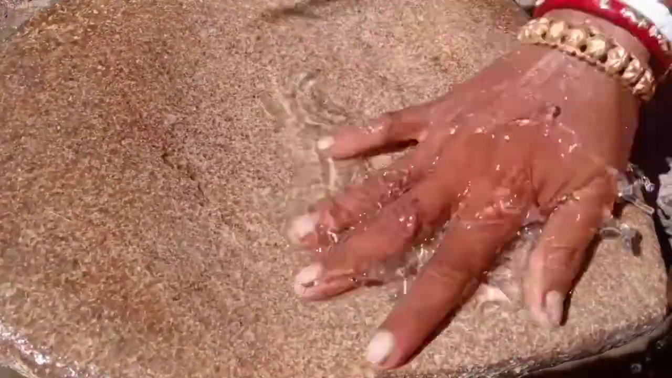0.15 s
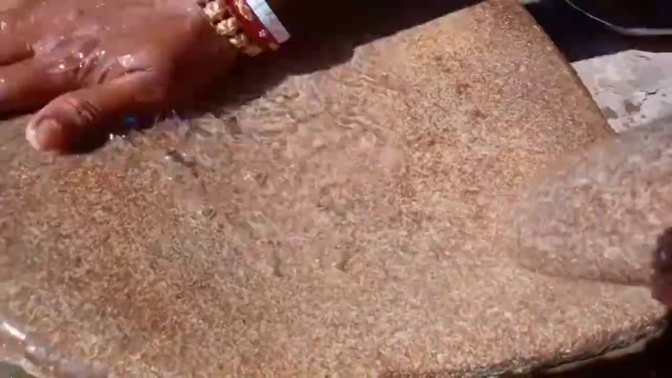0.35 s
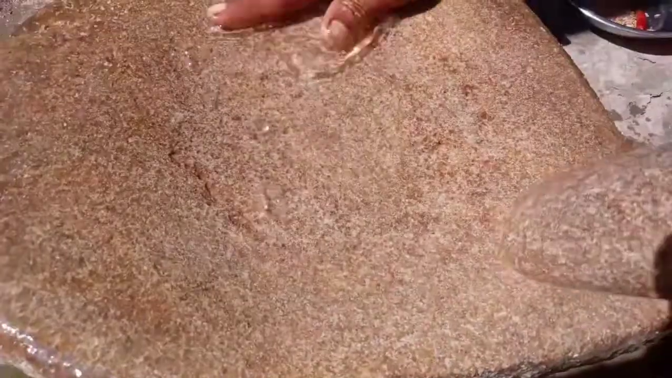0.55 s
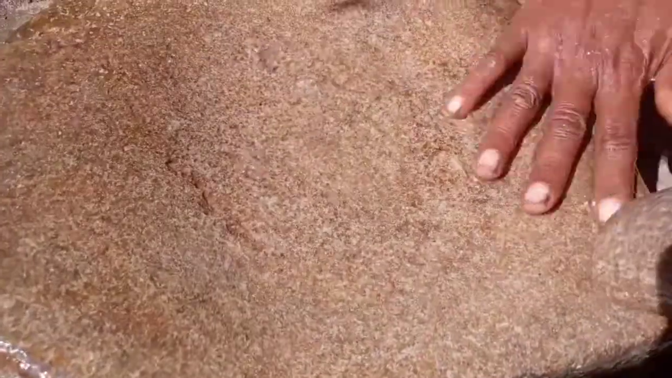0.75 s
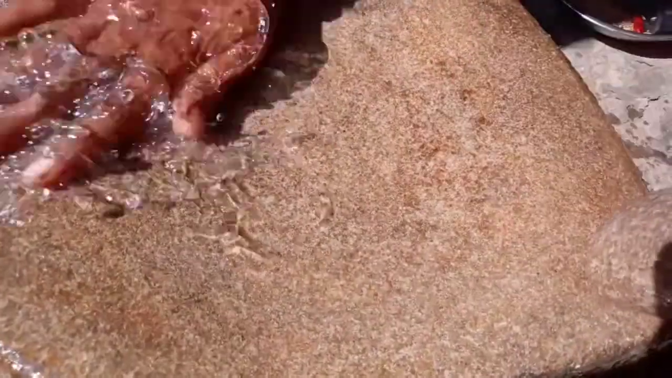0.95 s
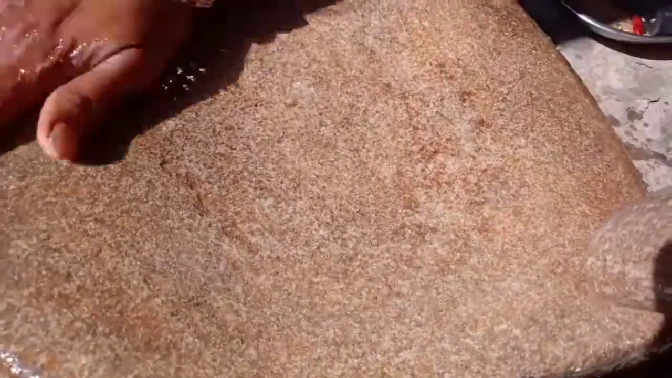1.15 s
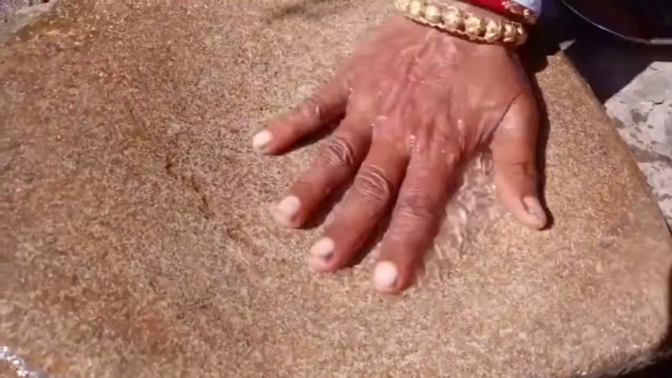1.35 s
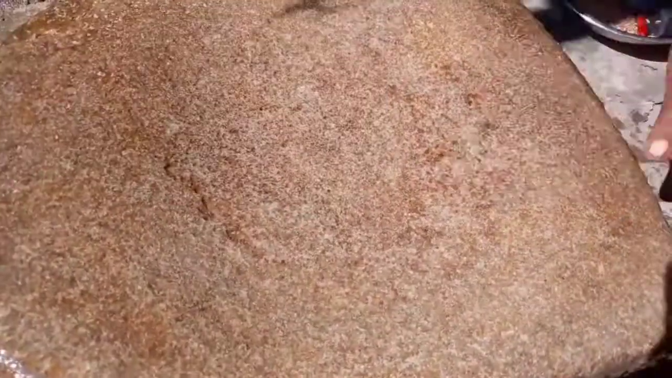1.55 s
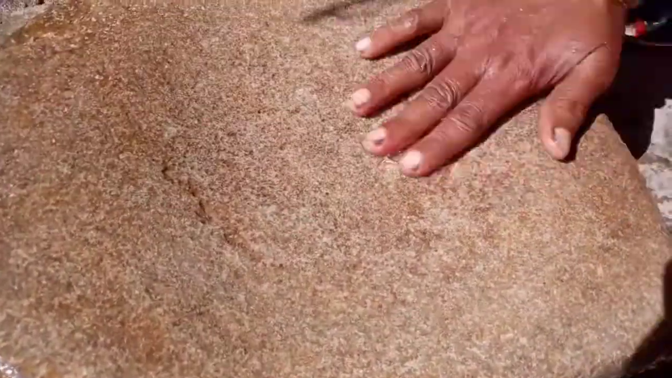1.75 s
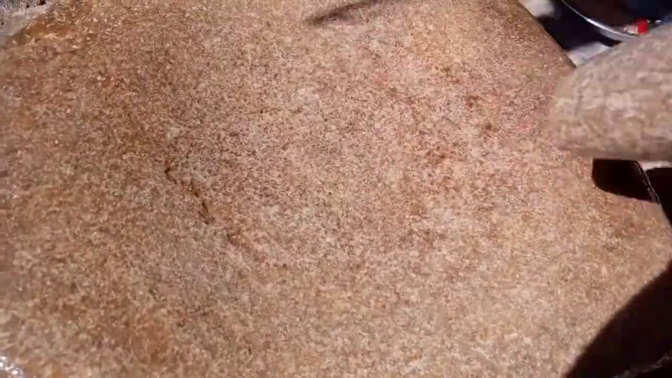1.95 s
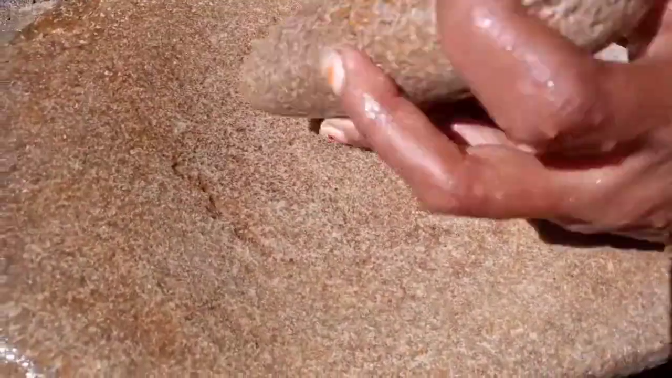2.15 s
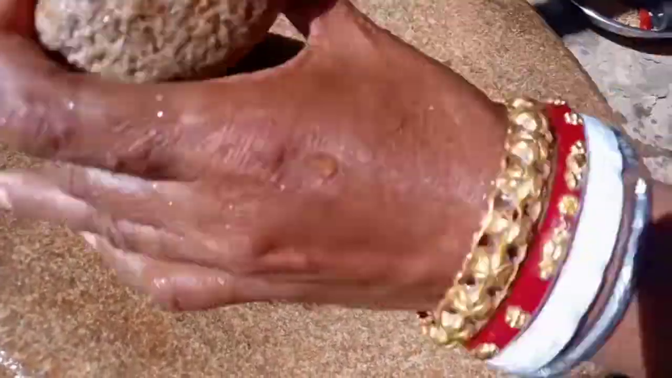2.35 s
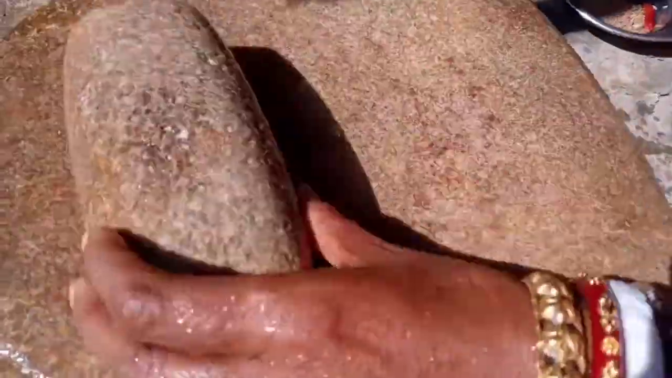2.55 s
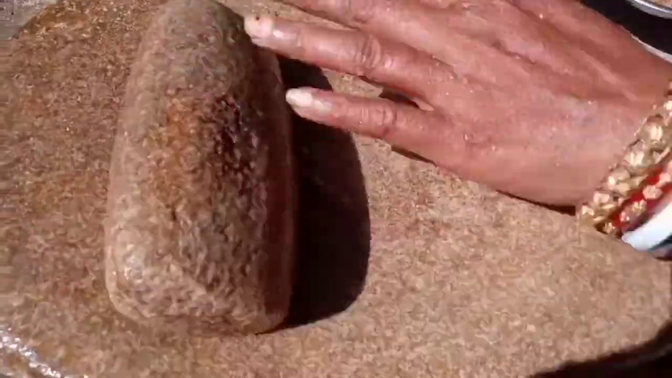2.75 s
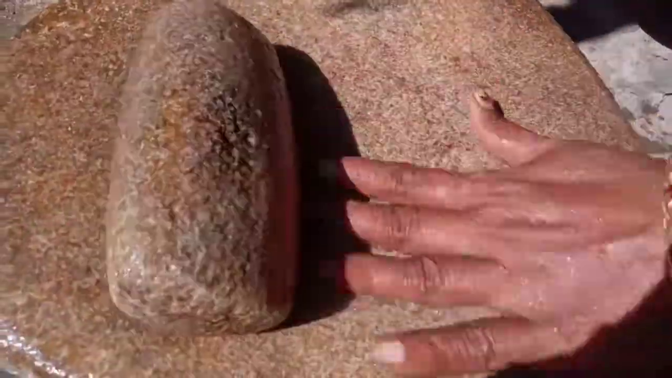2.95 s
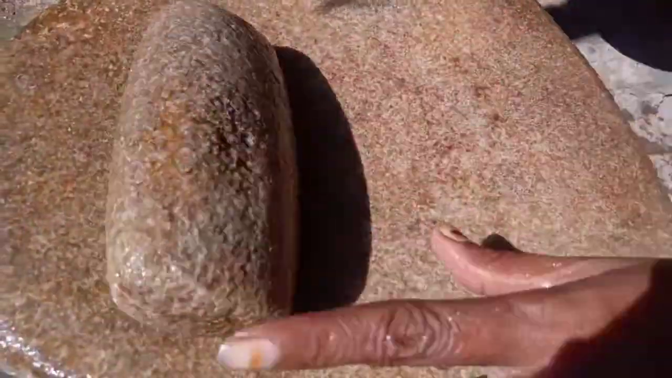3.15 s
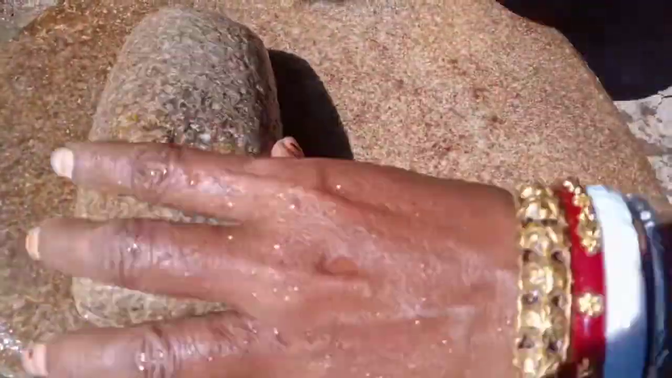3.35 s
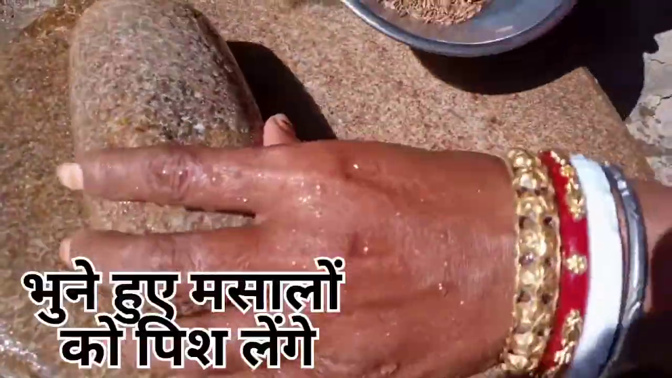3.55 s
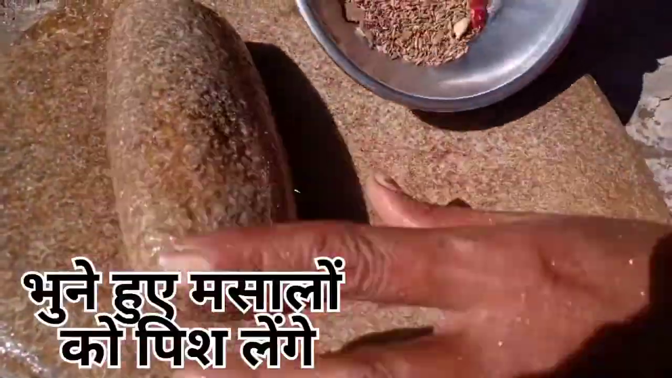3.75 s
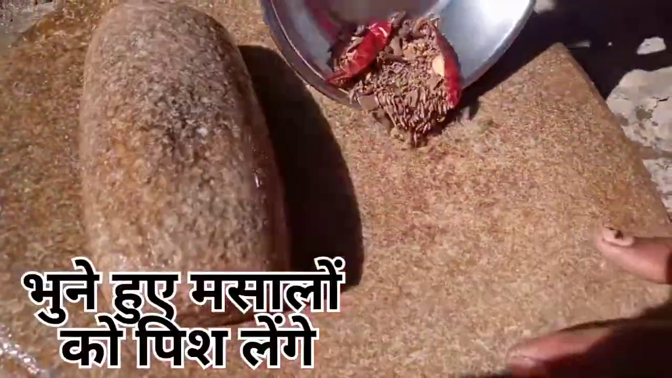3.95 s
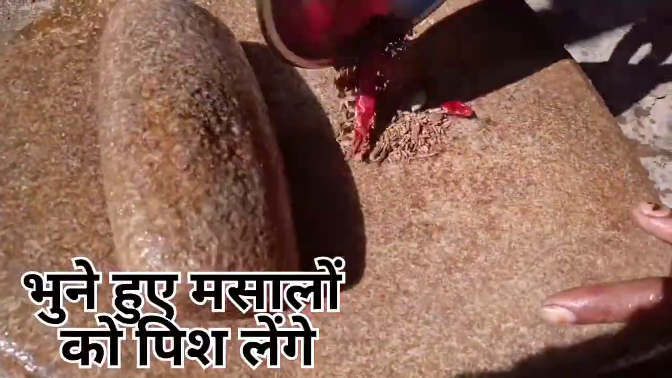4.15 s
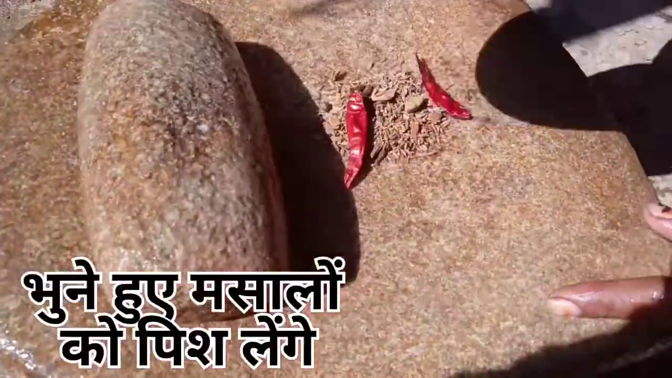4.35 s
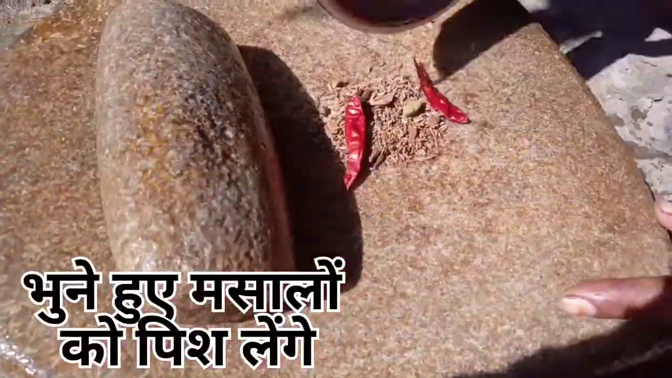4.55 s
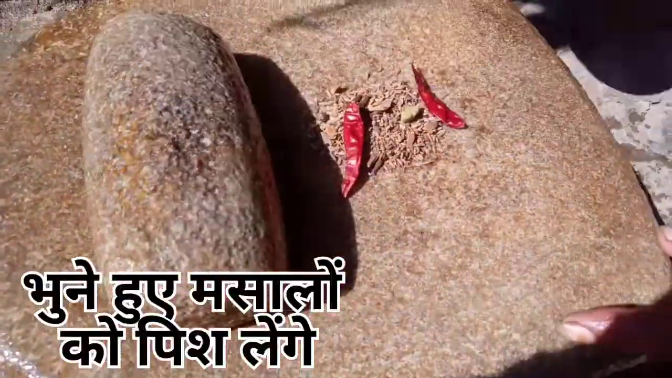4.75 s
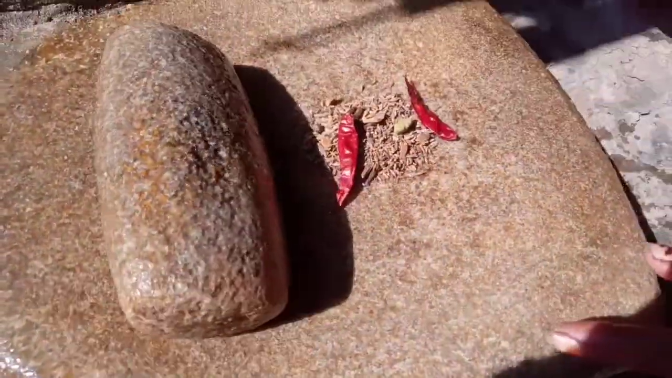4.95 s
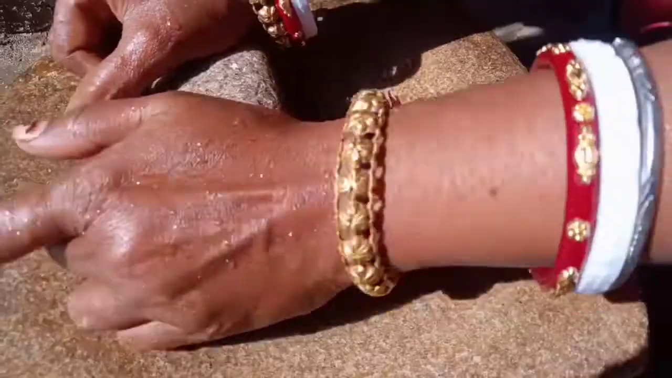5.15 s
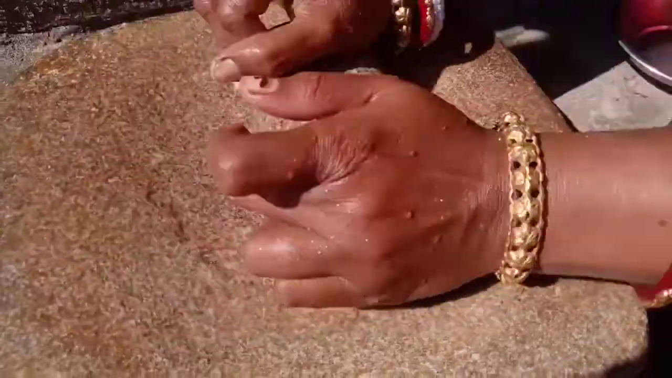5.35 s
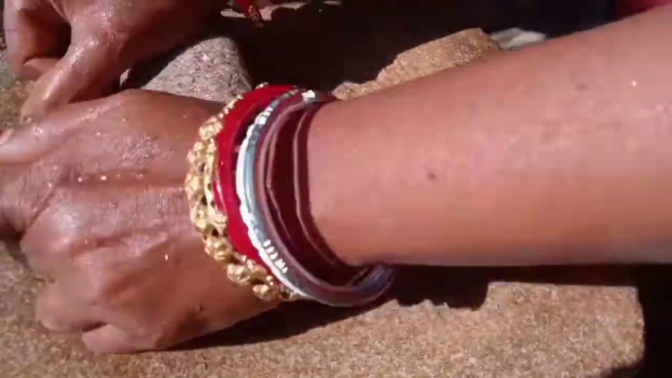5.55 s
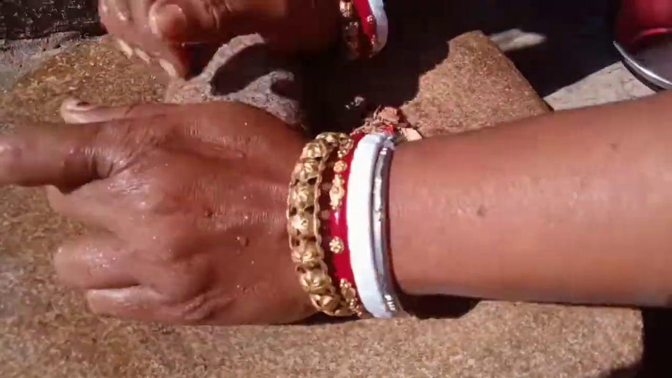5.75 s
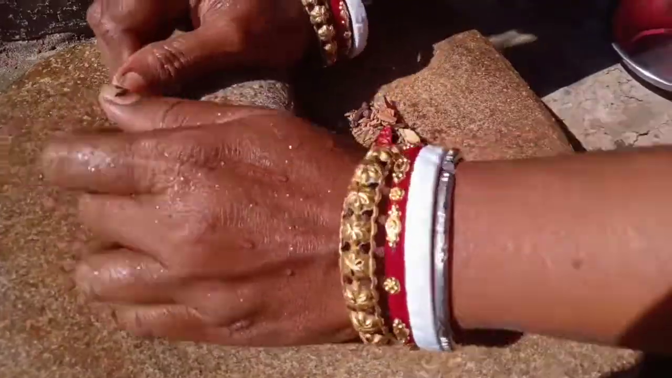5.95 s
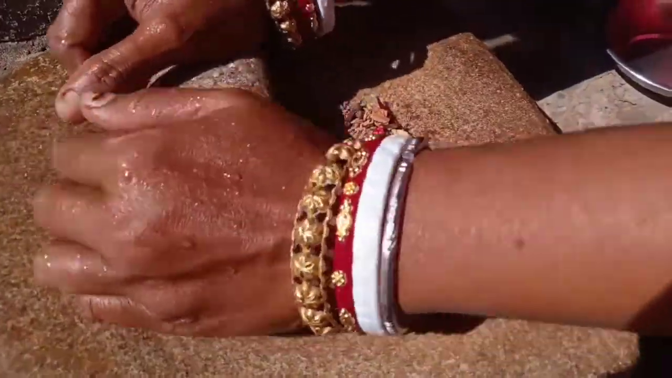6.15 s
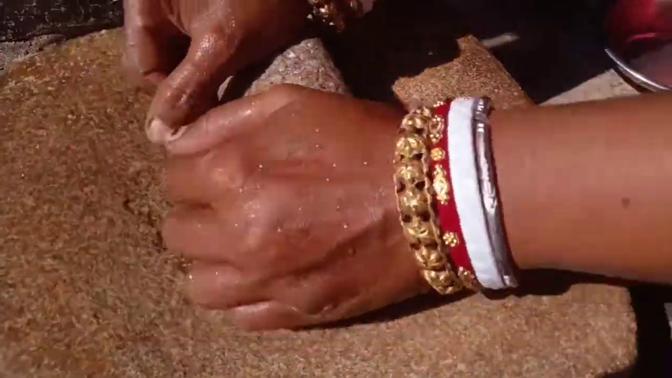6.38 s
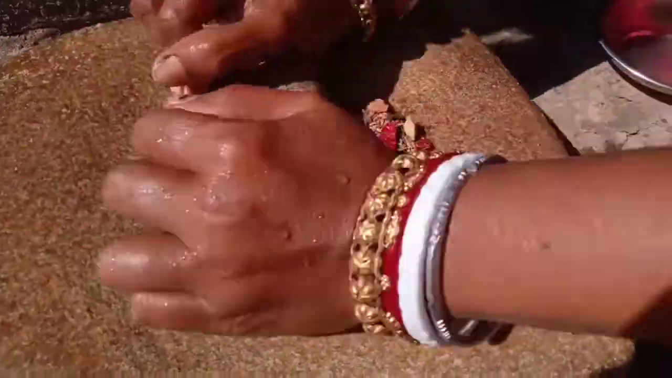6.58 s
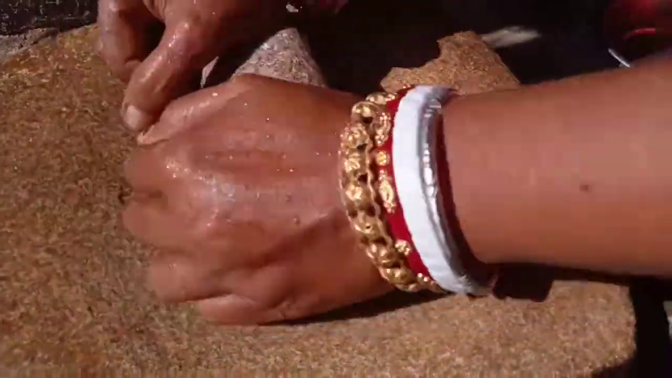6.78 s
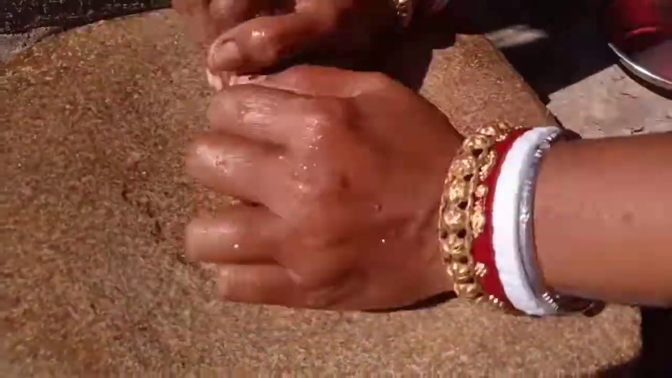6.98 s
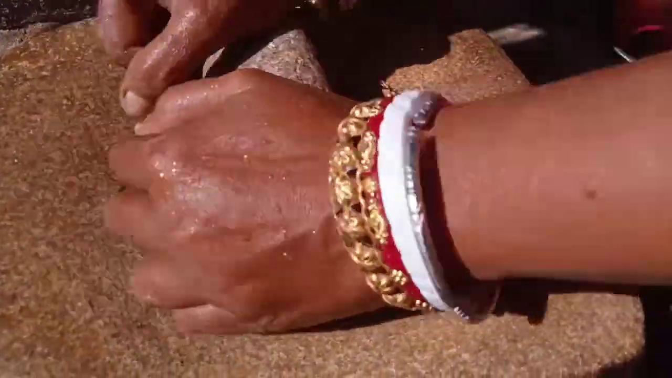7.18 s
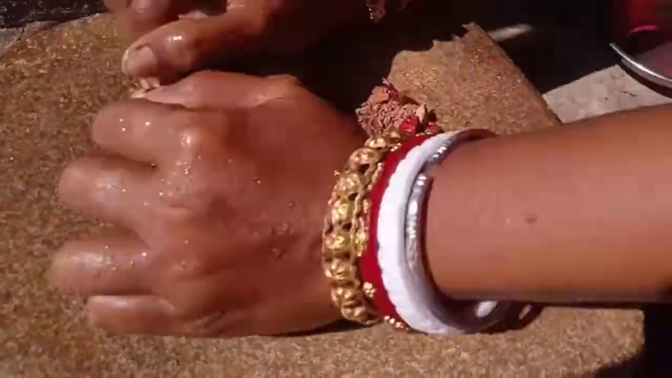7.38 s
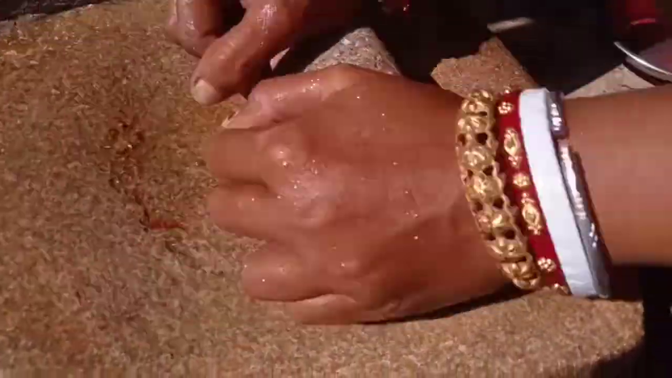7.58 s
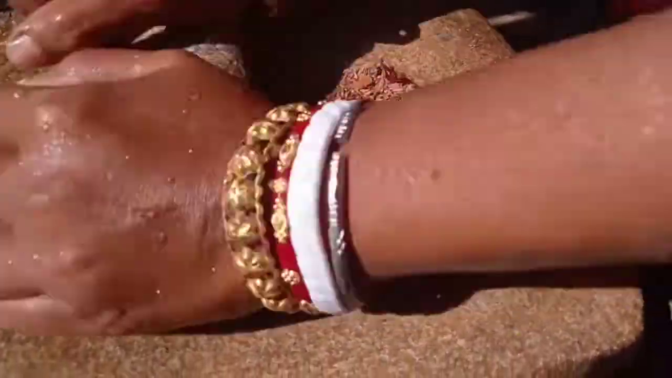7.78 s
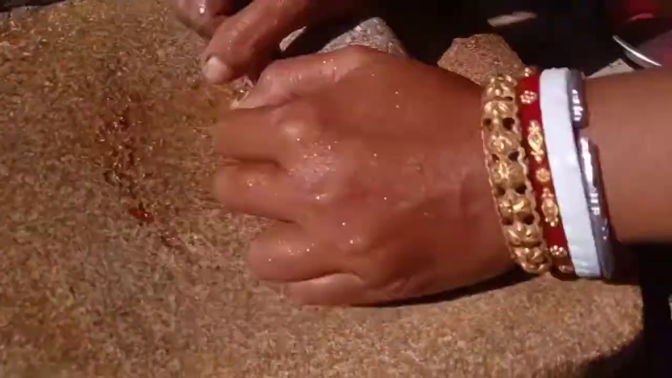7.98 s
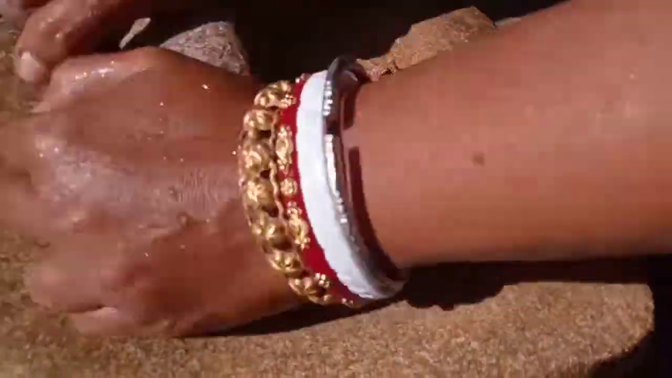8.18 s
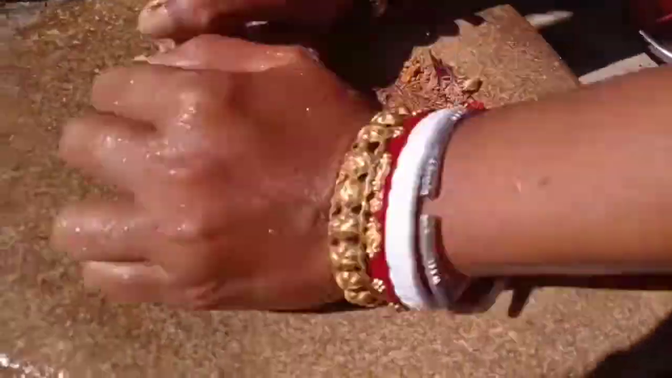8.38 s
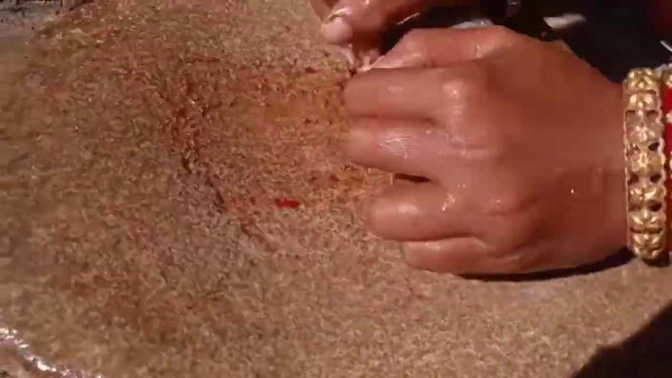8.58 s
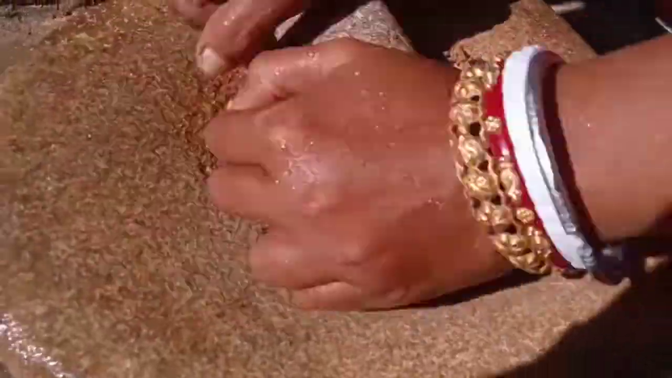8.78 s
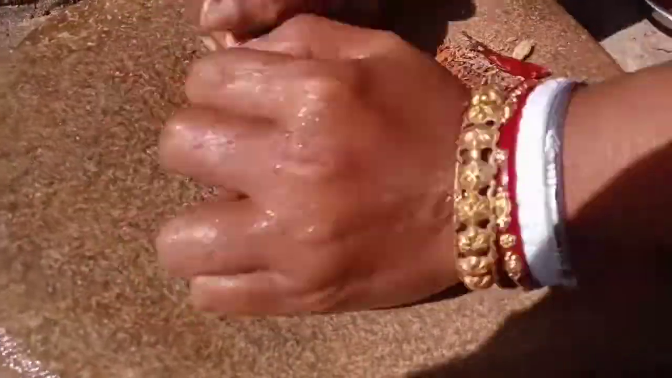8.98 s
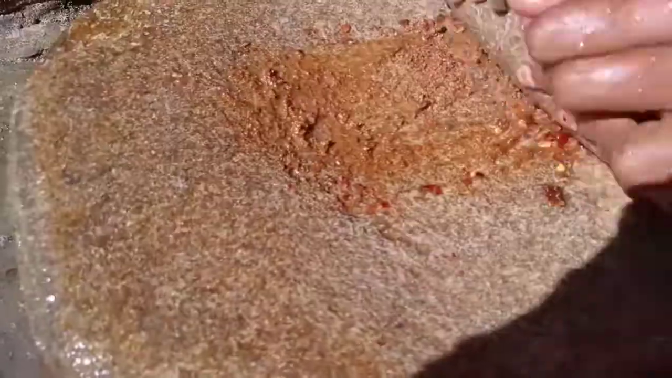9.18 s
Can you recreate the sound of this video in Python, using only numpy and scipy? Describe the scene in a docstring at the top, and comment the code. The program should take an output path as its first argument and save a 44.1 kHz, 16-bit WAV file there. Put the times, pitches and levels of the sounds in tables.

```python
"""A stone roller grinds spice on a rough slab: bursts of grit crackle and ring the stones as filtered noise and clicks.
First a wet hand wipes the slab, with gliding sine bubbles; blows of stone on stone ring resonances of the slab.
Wrist bangles clack as rattling noise over decaying modes; seeds slide from a steel bowl as clicks ringing its modes.
Everything is close to the phone with a short echo; behind it a quiet yard of hiss and rumble, with one faint low tone."""
import sys
import numpy as np
from scipy import signal
from scipy.fft import rfft, irfft
from scipy.io import wavfile
from scipy.ndimage import uniform_filter1d

SR = 44100
rng = np.random.default_rng(int(sys.argv[2]) if len(sys.argv) > 2 else 0)


def gain_from_db(level_db):
    """Turn a decibel level (scalar or array-like) into a linear amplitude factor."""
    decades = np.asarray(level_db, float) / 20
    return 10 ** decades


def master_out(mix):
    """Clip the mix to full scale and print it as 16-bit PCM to the path in sys.argv[1]."""
    frames = np.transpose(np.atleast_2d(mix))
    ceiling = np.clip(frames, -1, 1)
    pcm = np.round(ceiling * 32767).astype(np.int16)
    wavfile.write(sys.argv[1], SR, pcm)


N = 406602
TIME = np.arange(N) / SR


def unit(x):
    """Scale to rms 1."""
    return x / np.sqrt(np.mean(x ** 2))


def colour(x, points):
    """Causal filter through (Hz, dB) points, from the cepstrum of the log gain."""
    hz, db = np.transpose(points)
    grid = np.maximum(np.arange(2049) * SR / 4096, 1)
    cepstrum = irfft(np.interp(np.log(grid), np.log(hz), db) * np.log(10) / 20)
    # folding the cepstrum forward makes the filter minimum phase
    cepstrum[1:2048] *= 2
    cepstrum[2049:] = 0
    response = irfft(np.exp(rfft(cepstrum)))
    return signal.fftconvolve(x, response)[:len(x)]


def ring(x, peaks, widen):
    """Sum of two-pole resonances (Hz, width Hz before widening, dB), gain as listed at the centre."""
    out = 0
    for hz, width, db in peaks:
        out = out + gain_from_db(db) * signal.lfilter(*signal.iirpeak(hz, hz / (widen * width), SR), x)
    return out


def grains(rate, spread, hiss):
    """Random clicks of very unequal size, rate per second, over a smooth hiss; rms 1."""
    hit = rng.random(N) < rate / SR
    size_db = np.minimum(spread * rng.exponential(size=N), 9)
    clicks = hit * np.tanh(rng.standard_normal(N)) * gain_from_db(size_db)
    return unit(unit(clicks) + hiss * rng.standard_normal(N))


def walk(rate):
    """Random levels, rate per second, joined by straight ramps; rms 1."""
    k = int(SR / rate)
    steps = np.repeat(rng.standard_normal(N // k + 1), k)
    return unit(uniform_filter1d(steps, k)[:N])


def add(track, s, sound):
    """Mix a short sound in at time s."""
    i = int(s * SR)
    track[i:i + len(sound)] += sound[:N - i]


def played(rows, column):
    """Gain of a level curve, silent outside its rows."""
    rows = np.array(rows)
    return gain_from_db(np.interp(TIME, rows[:, 0], rows[:, column], left=-120, right=-120))


# resonances of the two stones: centre_hz, width_hz (before widening), level_db
STONE_MODES = [(850, 45, 1), (1040, 57, 0.5), (1470, 400, -14.5), (1797, 39, -8.5), (3040, 300, -21)]
# tone of skin and spice on the slab: freq_hz, relative_gain_db
PALM_TONE = [(350, -8), (650, -5), (1100, 0), (2100, -1.5), (3000, -26.5)]
# tone of crushed pieces cracking: freq_hz, relative_gain_db
CRUNCH_TONE = [(1180, -17.5), (2000, -6.5), (2110, -9), (2880, 0.5), (3340, 3.5), (4600, -6.5),
               (5500, -11.5), (7150, -4.5), (12100, -120)]
# tone of the fine grit: freq_hz, relative_gain_db
GRIT_TONE = [(2710, -28), (4600, -16.5), (6390, -10.5), (7790, 4.5), (10200, -12), (11200, -7), (12200, -8),
             (15100, -9.5), (16000, -2)]


def rubbing():
    """Stick and slip over the rough face: grit rings the stones and crackles in the treble."""
    # the contact catches and lets go, all bands together
    catch = np.clip(walk(70), -9, 1.6)
    grit = grains(1200, 1.7, 1.0)
    coarse = grains(900, 4.7, 1.0)
    low, middle, high = held("stones"), held("crunch"), held("grit")

    # the more the low part leads, the more it is bare stone ringing rather than skin or spice
    bare = low ** 2 / (low ** 2 + (2.5 * middle) ** 2)
    stones = colour(ring(coarse, STONE_MODES, 0.98), [(300, -10), (750, 3), (3000, 2), (5000, -28)])
    body = bare * unit(stones) + (1 - bare) * unit(colour(coarse, PALM_TONE))

    # each treble band flickers by itself
    specks = 0
    for hz in np.geomspace(4500, 15500, 8):
        specks = specks + ring(grit, [(hz, hz / 6, 0)], 1) * gain_from_db(3.5 * walk(70))
    fine = unit(colour(specks, GRIT_TONE))
    # harder contact swells the treble below about 10 kHz, while the very top stays as it is
    top_share = np.clip(0.014 * (20 * np.log10(high) + 40), -.6, .6)
    fine = fine + top_share * colour(fine, [(8500, 2.5), (10500, -20)])
    fine = unit(fine * gain_from_db(3.26 * catch + 1.3 * walk(120)))

    # pieces of every size crack at their own pitch and their own moments
    pieces = 0
    for hz in np.geomspace(1900, 6000, 9):
        pieces = pieces + ring(grit, [(hz, hz / 9, 0)], 1) * gain_from_db(np.minimum(6 * walk(60), 8))
    crunch = unit(colour(pieces, CRUNCH_TONE) * gain_from_db(1.67 * catch))

    return low * body * gain_from_db(2.7 * catch) + middle * crunch + high * fine


# In the stroke tables start_s comes after any lead-in, and each layer's mix below is added to level_db.
# spice crushed as the roller is pushed: start_s, length_s, level_db, brightness_db (grit layer only)
CRUSH_STROKES = [(5.272, 0.02, -36, -6), (5.343, 0.064, -32, -4.5), (6.537, 0.07, -31.5, 2),
                 (6.922, 0.067, -30, 0.5), (7.029, 0.051, -39.5, 7.5), (7.286, 0.073, -31, 2),
                 (7.668, 0.082, -31, 1.5), (8.033, 0.06, -33, 7.5), (8.172, 0.14, -43, 5),
                 (8.348, 0.04, -35, 9), (8.432, 0.032, -30, 5.5), (8.49, 0.084, -39.5, 0),
                 (8.622, 0.085, -37, 3.5), (8.926, 0.088, -33, 3)]
# bare stone dragged on stone: start_s, length_s, level_db
DRAG_STROKES = [(2.62, 0.088, -51), (3.39, 0.036, -53), (5.168, 0.087, -29.5), (5.407, 0.088, -45),
                (6.13, .07, -51), (6.32, 0.11, -36), (6.59, 0.065, -37), (6.815, 0.03, -33.5),
                (7.002, 0.022, -30), (7.134, 0.076, -44), (7.357, 0.072, -34.5), (7.492, 0.1, -46.5),
                (8.79, 0.046, -45)]
# wet hand wiping or brushing: start_s, length_s, level_db, brightness_db (grit layer only)
WIPE_STROKES = [(.097, 0.025, -45.5, -10), (.185, 0.096, -41.5, -13.5), (.374, 0.14, -37.5, 0.5),
                (.875, 0.097, -37, 0.5), (.991, 0.036, -42.5, -17), (1.068, 0.025, -40, 5.5),
                (1.139, 0.029, -36.5, 3), (1.19, 0.02, -46, 5), (1.241, 0.091, -41, -4),
                (2.918, 0.062, -47, 6.5), (6.114, 0.088, -48, 3)]
# bangles sliding and jingling together as the wrist turns: start_s, length_s, level_db
JINGLE_STROKES = [(2.809, 0.03, -29), (2.85, 0.049, -36.5), (3.123, 0.018, -46.5), (5.487, 0.034, -31),
                  (5.522, 0.045, -29), (5.585, 0.02, -39.5), (5.66, 0.015, -37.5), (5.86, 0.032, -48),
                  (9.03, 0.051, -28)]
# light steady contact of hand or roller between the strokes: time_s, level_db
CONTACT_LEVEL = [(0, -58), (.52, -48), (.6, -62), (1.33, -53), (1.55, -54.5), (2.3, -66.5), (2.55, -60.5),
                 (3, -64), (3.3, -69), (5.12, -69), (5.3, -45.5), (5.62, -49), (5.9, -60), (6.05, -57),
                 (6.28, -62), (6.45, -39.5), (6.72, -45), (7.1, -43), (7.6, -39), (8, -39.5), (8.5, -34),
                 (8.6, -43), (8.7, -37.5), (9.22, -45)]
# the roller nearly stops as it turns round, dipping the steady contact: time_s, dip_db
TURN_DIPS = [(6.5, -1.5), (6.72, -3), (8.01, -22), (8.31, -16), (8.6, -14), (8.9, -7.5)]
# what each kind of contact gives off: stones_db, crunch_db, grit_db, bangles_db
CRUSH_LAYERS = (-12, -0.65, 1.1, -8.5)
DRAG_LAYERS = (1.1, -19, -23, -47)
WIPE_LAYERS = (-11.5, -0.1, -1.5, -6.5)
JINGLE_LAYERS = (-16.5, -11, -1, -3.5)
CONTACT_LAYERS = (-9.5, 0.07, -6.5, -11.5)


def held(layer):
    """Gain of one layer: the powers of all contacts added."""
    column = ["stones", "crunch", "grit", "bangles"].index(layer)
    turn_s = 0.018  # half-width of a dip, to 1/e of its dB
    pause_db = sum(db * np.exp(-((TIME - s) / turn_s) ** 2) for s, db in TURN_DIPS)
    power = (played(CONTACT_LEVEL, 1) * gain_from_db(CONTACT_LAYERS[column] + pause_db)) ** 2

    def press(start, lead, db, shape):
        add(power, start - lead, (gain_from_db(db) * shape) ** 2)

    for start, length, db, bright_db in CRUSH_STROKES:
        lead = .07  # s; the roller gathers spice before it crushes it
        level = db + CRUSH_LAYERS[column] + bright_db * (layer == "grit")
        press(start, lead, level, stroke(length, lead, -21.5, 0.46))
    for start, length, db in DRAG_STROKES:
        lead = 0.41 * length  # a drag bites at once, then swells
        press(start, lead, db + DRAG_LAYERS[column], stroke(length, lead, -9.5))
    for start, length, db, bright_db in WIPE_STROKES:
        level = db + WIPE_LAYERS[column] + bright_db * (layer == "grit")
        press(start, 0, level, stroke(length))
    for start, length, db in JINGLE_STROKES:
        press(start, 0, db + JINGLE_LAYERS[column], stroke(length))
    if layer == "grit":
        # the bangles keep shivering after a clack, heard as fine hiss
        for start, db, *_ in CLACK_HITS:
            press(start, 0, db - 19, stroke(0.02))
    return uniform_filter1d(np.sqrt(power), size=SR // 400)


def stroke(length, lead=0., lead_db=0., step=0.):
    """Gain of one stroke: a swell that may end in a step, a sag as the hand slows, a short release."""
    sag_db_per_s, release_s = 7.5, 0.0088
    t = TIME[:int((lead + length + 8 * release_s) * SR)] - lead
    swell_db = lead_db * (step - (1 - step) * t / max(lead, 1e-3)) * (t < 0)
    release = np.exp(-np.maximum(t - length, 0) / release_s)
    return gain_from_db(swell_db - sag_db_per_s * np.maximum(t, 0)) * release


# stone knocks: time_s, level_db (before layer trims), pitch_hz
KNOCK_HITS = [(0.452, -15, 1170), (0.593, -34, 820), (0.618, -27, 2350), (0.761, -21.5, 730),
              (1.158, -29, 1600), (2.312, -19.5, 746), (2.326, -25, 1130), (2.338, -30.5, 1100),
              (2.447, -28.5, 2470), (2.561, -25.5, 850), (2.651, -33, 817), (2.662, -29, 850),
              (2.706, -37, 810), (2.784, -34.5, 844), (2.897, -35, 910), (2.927, -21, 2550),
              (3.615, -35.5, 910), (4.202, -34, 850), (5.2, -20, 1020), (5.438, -7.5, 1500),
              (5.549, -22.5, 860), (5.883, -38, 875), (6.351, -25.5, 794), (6.406, -21, 1530),
              (6.605, -20.5, 930), (6.828, -21, 1620), (7.139, -23, 1480), (7.498, -23, 830),
              (7.766, -10.5, 1510), (8.118, -13, 1280), (8.428, -9.5, 2110)]


def knocks():
    """Stone on stone: a pitched push and a gritty crack, brighter for hard blows, ring the stones' modes."""
    push, thud, crack = np.zeros((3, N))
    t = TIME[:int(SR / 30)]
    for s, db, hz in KNOCK_HITS:
        envelope = t * hz * np.exp(1 - 1.41 * t * hz) + 0.17 * np.exp(-t / 0.0049)
        add(push, s, gain_from_db(db) * np.sin(2 * np.pi * hz * t) * envelope)
        if hz < 1400 and s < 3:  # low blows thud the bare slab; spice deadens it later
            add(thud, s, gain_from_db(db) * np.sin(2 * np.pi * 470 * t) * np.exp(-t / 0.0029))
        add(crack, s, gain_from_db(1.447 * db) * np.exp(-t / 0.0075))
    crack = colour(crack * rng.standard_normal(N), [(600, -11), (2200, -1.5), (3800, -6), (6500, -34.0)])
    push = colour(push, [(150, -21), (550, -0.5)])  # the knocks carry little bass
    return push + gain_from_db(-3.5) * ring(push, STONE_MODES, 1.45) + gain_from_db(-5.0) * thud + gain_from_db(10.0) * crack


# bangles clacking: time_s, level_db (before layer trims), ring_share_db, pitch_hz
CLACK_HITS = [(0.1611, -12.5, -21, 3340), (0.3326, -24.5, -17.5, 7150), (0.5893, -50.5, 4, 7220),
              (0.95, -14.5, -17, 7920), (0.979, -25.5, 3, 3360), (1.168, -11, -13.5, 3920),
              (1.2434, -22.5, -5, 3680), (1.696, -24.5, -37, 7480), (2.299, -23, -21, 7850),
              (2.325, -41, 8, 2680), (2.447, -39.5, 3, 3700), (2.5392, -29, -16, 4550),
              (2.637, -23, -15.5, 11000), (2.8166, -33, -1, 5250), (2.824, -38, 5, 3330),
              (2.8718, -32, 3, 12800), (3.1225, -36, -2, 7850), (3.239, -21.5, -12, 8060),
              (5.489, -23, -6, 7160), (5.5276, -11, -12, 7790), (5.5667, -14, -4, 7860),
              (5.57, -41, 4, 4950), (5.605, -51, 4, 2650), (5.671, -25.5, -21, 4950),
              (5.7195, -27, -1, 7890), (5.758, -27.5, -20, 4280), (5.809, -40, 5.5, 3370),
              (5.872, -44, -1.5, 7230), (5.918, -48, 2, 7230), (6.656, -7.5, -10, 7920),
              (7.06, -5.5, -14, 7880), (7.104, -11, -10, 8100), (7.433, -6.5, -14, 7860),
              (7.472, -11, -11, 11200), (7.7947, -1, -11, 7930), (8.1422, -4.5, -14, 7670),
              (8.154, -12.5, 0.5, 7820), (8.4345, -9.5, -11, 7820), (8.515, -13.5, -9, 9550),
              (8.77, -18, -6, 3250), (9.0302, -6, -19, 7690), (9.17, -18, -4.5, 9480)]
# bangle modes: freq_hz, level_db, t60_s (the last two before each layer's own scaling)
BANGLE_MODES = [(2680, -5, 0.054), (3250, -10, 0.093), (3754, -3.5, 0.075), (5250, -17, 0.11),
                (7130, -4.5, 0.14), (7850, 6.5, 0.039), (9570, -2.5, 0.057), (10160, -4.5, 0.035),
                (11090, -3, 0.052), (13200, -17, 0.085)]


def bangles():
    """Each clack is an uneven rattle of touching rings; the nearest mode leads, at the struck ring's pitch."""
    rattles, tones = np.zeros((2, N))
    t = TIME[:int(SR / 5)]
    hz, mode_db, t60 = np.transpose(BANGLE_MODES)[:, :, None]
    rattle = np.exp(-np.log(1000) * t / 0.028) * (1 - np.exp(-t / 0.0013))
    for s, db, ring_db, pitch in CLACK_HITS:
        add(rattles, s, gain_from_db(db) * rattle)
        # each clack varies level and tuning of the other modes, and every phase;
        # the leading mode sounds at the listed pitch
        level_var, tune_var, phase = rng.standard_normal((3, len(BANGLE_MODES), 1))
        distance = np.abs(hz - pitch)
        lead = distance == distance.min()
        gain = gain_from_db(np.where(lead, 0, mode_db - 17.0 + 1.7 * level_var))
        tuned = np.where(lead, pitch, hz * (1 + 0.0041 * tune_var))
        modes = gain * np.exp(-np.log(1000) * t / t60) * np.sin(2 * np.pi * (tuned * t + phase))
        add(tones, s, gain_from_db(db + ring_db) * modes.sum(axis=0))
    touch = rng.standard_normal(N) * gain_from_db(3.4 * walk(300))
    bright = colour(rattles * touch, GRIT_TONE) / np.std(colour(touch, GRIT_TONE))
    dull = colour(rattles * touch, CRUNCH_TONE) / np.std(colour(touch, CRUNCH_TONE))
    return gain_from_db(-2.0) * bright + gain_from_db(-15.5) * dull + tones * gain_from_db(2 * walk(160))


def clinks():
    """Every jolt of the wrist makes rings touch: sparse tiny contacts, each mode struck at its own moments."""
    shaken, out = held("bangles"), 0
    for hz, db, t60 in BANGLE_MODES:
        taps = grains(45, 2.7, 0.1)
        mode = [(hz, np.log(1000) / np.pi / t60, 0)]
        out = out + gain_from_db(0.5 * db) * ring(taps * shaken, mode, 1.65) / np.std(ring(taps, mode, 2.3))
    return gain_from_db(-5.5) * out


# bubbles in the water film: time_s, level_db (before random flicker), start_pitch_hz, length_s
BUBBLES = [(.105, -27.5, 2440, 0.0052), (.215, -29, 1760, 0.01), (1.003, -36.5, 934, 0.016),
           (1.77, -49.5, 2050, 0.037)]


def water():
    """Bubbles glide up as they close; small ones fizz while the wet hand wipes."""
    out = np.zeros(N)
    small = []
    for when, level, pitch, size in rng.random((260, 4)):
        small.append((1.4 * when, 3 - 14 * level, 1100 * 4 ** pitch, .004 + .014 * size))
    for rows, scale in ((BUBBLES, gain_from_db(2.0 * walk(300))), (small, held("crunch"))):
        for s, db, hz, length in rows:
            t = TIME[:int(length * SR)]
            shape = np.sin(np.pi * (t / length) ** 0.62) * scale[int(s * SR):][:len(t)]
            add(out, s, gain_from_db(db) * shape * np.sin(2 * np.pi * hz * t * (1 + 0.087 * t / length)))
    return out


# seeds sliding out of the bowl: time_s, level_db
POUR_LEVEL = [(3.62, -79), (3.8, -48.5), (3.92, -42), (4.05, -48.5), (4.2, -48.5), (4.25, -51.5),
              (4.3, -79)]
# modes of the steel bowl: centre_hz, width_hz (before narrowing), relative_level_db
BOWL_MODES = [(2050, 71, -7.5), (2990, 25, 4), (3530, 57, -7), (4370, 40, -9), (5980, 27, -1),
              (7130, 32, -5), (7240, 58, 5.5), (8100, 56, 1), (9550, 41, -4), (10170, 80, -3)]
# seeds and chillies landing: time_s, level_db (before the layer trim)
LANDINGS = [(3.7514, -42), (4.005, -32), (4.0337, -28), (4.106, -28.5), (4.1638, -26), (4.185, -23.5)]


def seeds():
    """Seeds hiss over steel and ring its modes until the bowl is empty; larger pieces tick on the slab."""
    stream = grains(2500, 2.7, 0.78)
    steel = 0
    for mode in BOWL_MODES:  # each mode swells and fades by itself
        steel = steel + ring(stream, [mode], 0.71) * gain_from_db(3.5 * walk(25.1))
    full = np.clip((4.18 - TIME) / 0.28, 0, 1)
    ticks = np.zeros(N)
    for s, db in LANDINGS:
        add(ticks, s, gain_from_db(db) * np.exp(-TIME[:SR // 40] / .004))
    slab = gain_from_db(-10) * unit(colour(stream, CRUNCH_TONE)) + unit(colour(stream, GRIT_TONE))
    pour = played(POUR_LEVEL, 1) * (full * unit(steel) + slab)
    return pour + gain_from_db(-7.5) * colour(ticks * slab, [(7000, 1.0), (14000, -18)])


# tone of the yard's far hiss: freq_hz, relative_gain_db
YARD_TONE = [(18, -30), (30, -0.5), (152, -1.5), (192, -1.5), (359, -1), (3490, -10.5), (5310, -25.5),
             (8060, -16.5), (10500, -101), (15500, -72)]
# low rumble of the ground: time_s, level_db
RUMBLE_LEVEL = [(0, -54.5), (1.3, -57.5), (3, -60.5), (6.2, -63), (7, -55.5), (9.22, -50.5)]
# a faint low tone far off: start_s, end_s, pitch_hz, level_db
FAR_TONE = (1.45, 1.75, 272, -63)


def yard():
    """Smooth far hiss, a wavering low rumble and one faint low tone."""
    hiss = unit(colour(rng.standard_normal(N), YARD_TONE)) * gain_from_db(-60 + 0.72 * walk(3.54))
    low = colour(rng.standard_normal(N), [(40, -43.5), (90, -2), (125, 0.5), (205, -1.0), (450, -34.5)])
    # the grinding shakes the ground as well
    shake = played(RUMBLE_LEVEL, 1) + gain_from_db(-30.5) * held("crunch")
    start, end, hz, db = FAR_TONE
    swell = np.sin(np.pi * np.clip((TIME - start) / (end - start), 0, 1)) ** .5
    tone = gain_from_db(db) * np.sin(2 * np.pi * hz * TIME) * swell
    return hiss + unit(low) * shake * gain_from_db(walk(9.2)) + tone


def scene():
    """Everything close to the phone, with a short echo from nearby walls, over the yard."""
    near = rubbing() + knocks() + bangles() + clinks() + water() + seeds()
    t = TIME[:int(SR / 4)]
    tail = rng.standard_normal(len(t)) * np.exp(-np.log(1000) * t / 0.21) * (t > .003)  # t60 0.21 s
    echo = signal.fftconvolve(near, tail / np.linalg.norm(tail))[:N]
    mono = near + gain_from_db(-16) * echo + yard()
    # when the level is low, patches of treble noise differ between left and right
    quiet = uniform_filter1d(mono ** 2, size=SR // 2) < gain_from_db(-38) ** 2
    patches = uniform_filter1d(quiet * (walk(20) > -.2) * 1., size=SR // 200)
    blur = rng.standard_normal(128) / np.sqrt(128)
    blurred = np.convolve(mono, blur)[:N]
    difference = patches * colour(blurred, [(3600, -60), (4600, -9), (8000, -19.0), (12000, -4.0)])
    return np.array([mono + difference, mono - difference])


def top_cut(x):
    """Nothing passes above the cut-off."""
    return signal.sosfilt(signal.butter(12, 16980, fs=SR, output="sos"), x)


def record(dry):
    """The phone cuts the lowest bass and the top."""
    no_bass = signal.sosfilt(signal.butter(3, 45, "high", fs=SR, output="sos"), dry)
    mix = signal.sosfilt(signal.ellip(8, .2, 35, 15800, fs=SR, output="sos"), no_bass)
    return top_cut(mix)


dry = scene()
out = record(dry)
master_out(out)
```